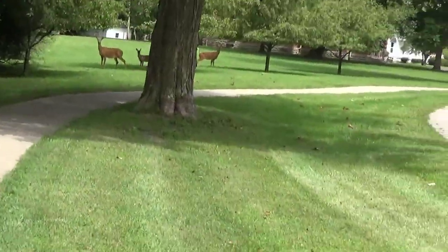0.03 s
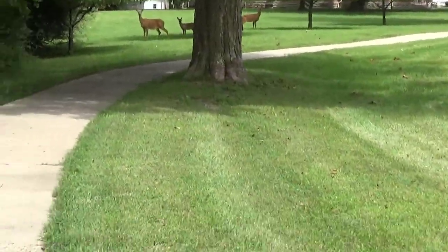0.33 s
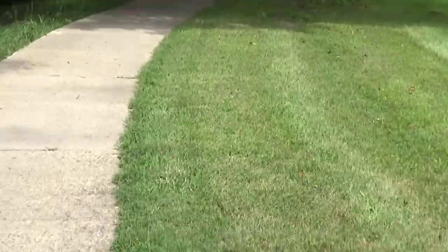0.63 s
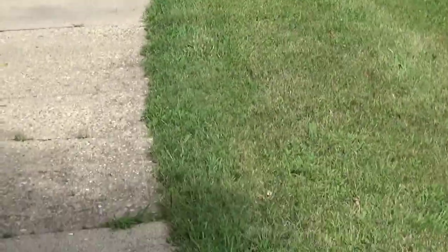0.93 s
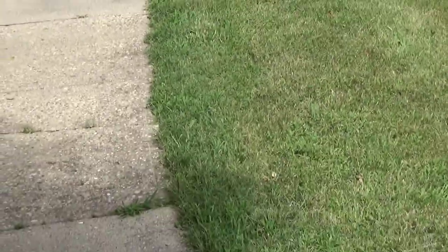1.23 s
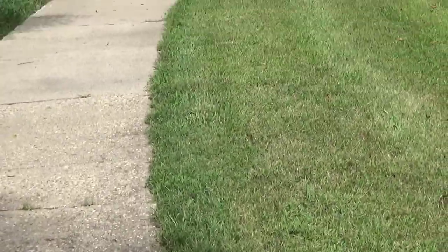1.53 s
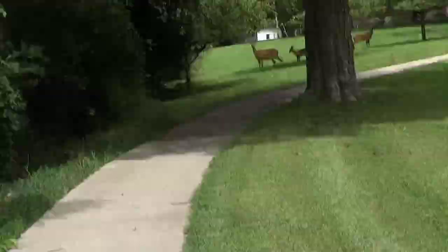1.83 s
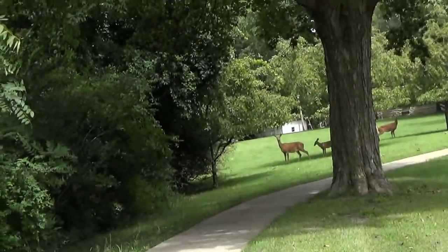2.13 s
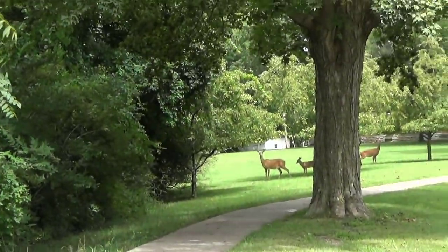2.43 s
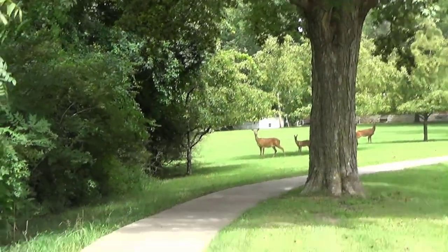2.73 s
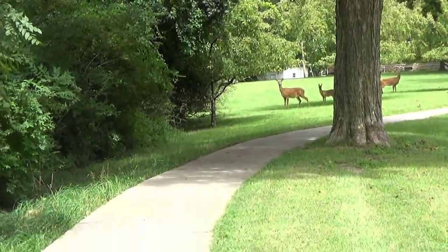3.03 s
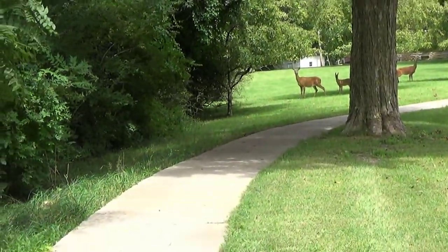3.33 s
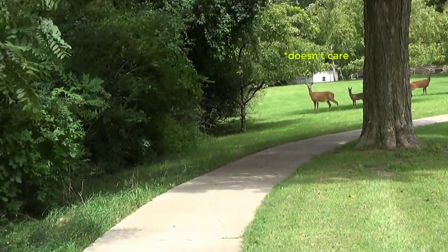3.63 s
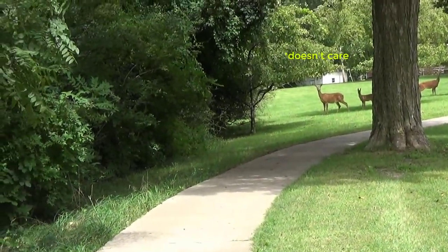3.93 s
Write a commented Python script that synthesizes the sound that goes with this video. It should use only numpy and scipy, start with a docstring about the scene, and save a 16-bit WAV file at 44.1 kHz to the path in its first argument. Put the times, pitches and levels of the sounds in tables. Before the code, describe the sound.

A bicycle bell rings close by outdoors. First the bike rolls with a low rushing noise, rattling at the start, ticking from 0.6 to 1.3 seconds, then clattering again. The bell comes in bright metallic flurries from about 1.6 to 2.2 seconds, 2.7 to 3, 3.1 to 3.5, and again near 3.9, ringing on between them. The rolling noise drops as the bell begins. Insects chirp faintly behind.

```python
"""Bicycle and thumb bell in a park

A bicycle rolls slowly: a ratchet ticks, loose parts rattle, insects chirp.
The bell is rung in four flurries; each clapper blow stops the dome and sets it ringing anew.
A limiter holds the bell down, so its low partials swell as the high ones die."""
import sys
import numpy as np
from scipy import signal
from scipy.fft import rfft, irfft
from scipy.io import wavfile
from scipy.ndimage import uniform_filter1d

SR = 44100
rng = np.random.default_rng(int(sys.argv[2]) if len(sys.argv) > 2 else 0)


def wav_out(sig):
    """Save sig, one row per channel (or a flat mono array), as 16-bit PCM at SR to the path in sys.argv[1]."""
    wavfile.write(sys.argv[1], SR, np.round(np.clip(np.atleast_2d(sig).T, -1, 1) * 32767).astype(np.int16))


N = 176400

# clapper blows: t/s, click/dB, partials 1-4/dB, twin 2/dB, twins 4 and 5/dB (twins re their partials)
BLOWS = [(1.568, -10, -24.5, -11, -8.5, -4, -17, -9.5), (1.646, -5, -24, -8.5, -16, -1, -7, -13),
         (1.679, -10, -43, -22.5, -18.5, -11, -25, -12), (1.709, -13, -36, -22, -15, -15, -7, -16),
         (1.73, -5.5, -22.5, -14, -7.5, -7.5, -17, -19), (1.885, -7.5, -27, -19, -15.5, -14, -22, -26),
         (1.934, -7, -23.5, -22.5, -22, 6.5, -3, -18), (1.974, -13, -38, -18, -10.5, -3, -16, -16),
         (2.013, -13, -29, -16.5, -12, 0, -20, -20), (2.047, -18, -27.5, -21.5, -7.5, -3, -17, -24),
         (2.064, -27, -28, -20.5, -15, -7.5, -22, -4.5), (2.113, -27, -30, -24, -26, -9, -21, -8),
         (2.191, -36, -32, -27, -31, -17.5, -30, -20), (2.667, -21, -39.5, -40.5, -28.5, -13, -18, -28),
         (2.722, -7, -25.5, -29, -10, 2, 8, -23), (2.754, -10.5, -24, -15.5, -5, 0.5, -21, -15),
         (2.807, -13, -29, -22.5, -15.5, -16, -19, -19), (2.838, -20, -37, -30, -13, -4.5, 2, -26),
         (2.908, -16, -42, -21, -17, -14.5, -5, -24), (2.943, -15, -33, -30.5, -13.5, -4.5, 8.5, -16),
         (2.975, -22.5, -46.5, -24, -15, -12, -19, -14), (3.009, -21, -27.5, -19.5, -5, -5.5, 6.5, -15),
         (3.022, -28, -33, -25, -11, -10.5, -10, 3.5), (3.129, -14, -31.5, -17, -11.5, -4, -11, -16),
         (3.208, -26, -40.5, -26.5, -16, -18, -5.5, -23), (3.259, -21, -38, -28.5, -33, -11.5, -7, -28),
         (3.275, -22, -49, -34, -21, -18, -4.5, -15), (3.341, -24, -51.5, -39.5, -40, -36, -21, -6),
         (3.408, -13.5, -30.5, -22, -12, -3, -8.5, -19), (3.452, -15, -27.5, -18.5, -14, -3.5, -21, -13),
         (3.88, -19, -34, -36.5, -18.5, -7.5, -14, -22), (3.907, -24, -29, -26.5, -21, -1, -17, -14),
         (3.927, -10, -27, -21.5, -16.5, -10, -6, -5), (3.945, -22, -28.5, -15.5, -5, -1, -12, -25),
         (3.968, -18, -24, -24, -7.5, 2.5, -15.5, -17)]
# dome partials 1-5: f/Hz
DOME_HZ = [1742.3, 4205.5, 7087.5, 10365.8, 14091]
# dome partials 1-5: T60/s
DOME_T60_S = [1.54, 1.45, 0.75, 0.34, 0.16]
# twins of partials 2-5: f/Hz
TWIN_HZ = [4162, 6985.5, 10187.5, 13819]
# lever hits its stop: t/s, level/dB
LEVER_STOPS = [(2.805, -10), (3.193, -8)]
# thumb drives the gears: start/s, end/s, level/dB
THUMB_STROKES = [(1.74, 1.935, -40.5), (3.153, 3.23, -37.5)]
# ratchet ticks: t/s, level/dB
RATCHET_TICKS = [(0.567, -26), (0.677, -24), (0.686, -24.5), (0.721, -23), (.750, -24), (0.856, -23.5),
                 (0.863, -31), (.876, -22), (.890, -26), (0.908, -21.5), (0.968, -20), (0.994, -20),
                 (1.007, -19), (1.021, -23), (1.030, -22), (1.039, -22.5), (1.048, -25), (1.059, -24),
                 (1.074, -20), (1.107, -19.5), (1.138, -18), (1.196, -19.5), (1.239, -20), (1.256, -17)]
# jolts of loose parts and bell lever: t/s, clatter/dB, knock/dB
RATTLES = [(0.0, -21.5, -45), (0.017, -16, -52), (.026, -16.5, -49), (0.09, -19.5, -45), (0.098, -38, -27),
           (0.103, -38, -20), (0.108, -19.5, -21.5), (0.117, -49, -18.5), (0.158, -25.5, -27),
           (1.216, -24, -27), (1.346, -18, -20.5), (1.375, -15, -16.5), (1.384, -23, -16), (1.4, -19, -24),
           (1.410, -18, -14), (1.433, -24, -30), (1.444, -9, -11.5), (1.525, -27.5, -27.5),
           (1.546, -28, -28.5), (1.607, -33, -18), (2.266, -39, -38), (2.299, -34, -46)]
# handlebar bumps: t/s, level/dB
BUMPS = [(0.103, -24.5), (1.828, -40), (1.901, -33.5), (2.264, -33)]
# loose bracket's modes: f/Hz
BRACKET_HZ = [630, 2802]
# resonances of frame and fittings: f/Hz, peak gain/dB
FRAME_MODES = [(2200, -6), (2835, -1), (3510, 6), (4380, 8), (5465, -0.5), (6720, 8), (8450, 2.5),
               (9020, -2), (9740, 1), (11100, 6.5)]
# chirp trains: start/s, end/s, f/Hz, chirp rate/Hz, level/dB
INSECTS = [(0, 1.7, 7360, 27.5, -38), (.2, 1.25, 4600, 10, -47), (2.2, 4, 8300, 21, -54)]
# rolling noise and open air: t/s, level/dB
AIR_LEVELS = [(0, -36), (.45, -37), (.9, -33), (1.62, -34.5), (1.69, -48), (2.3, -48.5), (4, -51)]
# noise spectra: f/Hz, relative density/dB
CLICK_SPECTRUM = [(500, -19), (1700, 0.5), (4000, -4.5), (8000, 8.5), (11000, 6), (15500, -14)]
STOP_SPECTRUM = [(300, -54), (750, -12), (1350, -6), (1880, 15), (2350, -19), (4500, -2), (9000, 1),
                 (15000, -26.5)]
TICK_SPECTRUM = [(1000, -8), (2600, -15), (3400, -2), (6500, -10.5), (8800, 4), (11200, 0.5), (12100, -14),
                 (15500, -11)]
CLATTER_SPECTRUM = [(1500, -30), (3800, -5.5), (7000, 1), (10000, 2), (11200, -8), (12500, -14),
                    (15500, -14)]
KNOCK_SPECTRUM = [(250, 7), (620, -0.5), (1200, -10.5), (1800, 4.5), (3400, 0), (8000, -24)]
BUMP_SPECTRUM = [(170, -11), (390, -2), (650, -3), (1000, -12.5), (8000, -18)]
AIR_SPECTRUM = [(25, -7), (70, -0.5), (200, -2.5), (750, -11), (2200, -18.5), (4000, -23), (6200, -23),
                (8500, -16), (12000, -28.5), (15500, -32)]

TIME_S = np.arange(N) / SR
FIFTH_RE_FOURTH_DB, THIRD_TWIN_DB = -12, -11.5
FIRM_CLICK_DB, GRIP_S, CONTACT_S, KICK_RAD_PER_KHZ = -22, 0.0019, 0.0014, 0.168
LIMIT_DB, LIMIT_SHARE, RELEASE_DB_PER_S = -18, 0.87, 412
SENSE_HZ, SENSE_S, CEILING, CUTOFF_HZ = 8040, 0.0051, 0.56, 15700


def bell():
    """Five dome partials; the upper four beat against their twins."""
    _, _, hum, second, third, fourth, low_twin, high_twin = np.transpose(BLOWS)
    fifth = fourth + FIFTH_RE_FOURTH_DB
    levels_db = [hum, second, third, fourth, fifth]
    twins_db = [second + low_twin, third + THIRD_TWIN_DB, fourth + high_twin, fifth + high_twin]
    modes = [*zip(DOME_HZ, DOME_T60_S, levels_db), *zip(TWIN_HZ, DOME_T60_S[1:], twins_db)]
    return sum(dome_mode(*mode) for mode in modes)


def dome_mode(hz, t60_s, levels_db):
    """Each blow resets the decaying mode's level; a firm one first chokes it and jolts its phase."""
    blow_s, click_db = np.transpose(BLOWS)[:2]
    firmness = np.minimum(from_db(click_db - FIRM_CLICK_DB), 1)
    last = np.maximum(np.searchsorted(blow_s, TIME_S) - 1, 0)
    coming = np.minimum(last + 1, len(blow_s) - 1)
    age_s = np.maximum(TIME_S - blow_s[last], 0)
    wait_s = blow_s[coming] - TIME_S
    choke = 1 - firmness[coming] * np.exp(-(wait_s / GRIP_S) ** 2) * (wait_s >= 0)
    kicks_rad = firmness * rng.normal(0, KICK_RAD_PER_KHZ * hz / 1000, len(blow_s))
    phase_rad = np.cumsum(kicks_rad) + 2 * np.pi * rng.random()
    decay = from_db(levels_db[last] - 60 * age_s / t60_s) * (TIME_S > blow_s[0])
    swing = choke * decay * np.exp(1j * phase_rad)[last]
    pole = np.exp(-2 / (CONTACT_S * SR))  # contact time rounds each step
    rounded = signal.lfilter([1 - pole], [1, -pole], swing)
    return np.real(rounded * np.exp(2j * np.pi * hz * TIME_S))


def bell_works():
    """The clapper clicks, the gears shudder after each blow, the lever hits its stop and rings."""
    blow_s, click_db, *partials_db, _, _ = np.transpose(BLOWS)
    stop_s, stop_db = np.transpose(LEVER_STOPS)
    clapper = bursts(blow_s, click_db - 4, CLICK_SPECTRUM, decay_s=0.00082)
    shudder = bursts(blow_s, np.max(partials_db, axis=0) - 29.5, CLICK_SPECTRUM, decay_s=0.021)
    stop = bursts(stop_s, stop_db, STOP_SPECTRUM, decay_s=0.0035)
    lever = ring(impulses(stop_s, stop_db - 9), hz=1818, t60_s=0.042)
    return clapper + shudder + stop + lever


def gears():
    """Teeth grind unevenly under the thumb."""
    gate = sum(from_db(db) * (TIME_S > start) * (TIME_S < end) for start, end, db in THUMB_STROKES)
    roughness = from_db(5.5 * drift(250))
    return frame(uniform_filter1d(gate, size=900) * roughness * noise(CLICK_SPECTRUM))


def ratchet():
    """Dry metallic ratchet ticks, ringing briefly."""
    tick_s, tick_db = np.transpose(RATCHET_TICKS)
    return frame(bursts(tick_s, tick_db + 2, TICK_SPECTRUM, decay_s=0.0048))


def rattles():
    """Loose parts clatter and knock on the frame; a bracket pings once; the handlebar bumps."""
    jolt_s, clatter_db, knock_db = np.transpose(RATTLES)
    clatter = bursts(jolt_s, clatter_db, CLATTER_SPECTRUM, decay_s=0.0081)
    knock = bursts(jolt_s, knock_db, KNOCK_SPECTRUM, decay_s=0.0052)
    bracket_hit = impulses(times_s=np.array([0.117]), db=-23)
    ping = sum(ring(bracket_hit, hz, t60_s=0.082) for hz in BRACKET_HZ)
    handlebar = bursts(*np.transpose(BUMPS), BUMP_SPECTRUM, decay_s=0.024)
    return frame(clatter + knock) + ping + handlebar


def frame(contacts):
    """Contacts sound directly and through the briefly ringing frame."""
    ringing = sum(from_db(db) * resonance(contacts, hz, width_hz=64) for hz, db in FRAME_MODES)
    return from_db(-1.5) * contacts + ringing


def whir():
    """Narrow-band rubbing noise, one swell as the bicycle rolls."""
    start_s, end_s = 0.49, 1.12
    swell = np.sin(np.interp(TIME_S, [start_s, end_s], [0, np.pi]))
    rubbing = rms_one(resonance(rng.standard_normal(N), hz=2090, width_hz=86))
    return from_db(-46.5) * swell * rubbing


def insects():
    """Trains of thin chirps, each arching in pitch."""
    out = np.zeros(N)
    for start_s, end_s, hz, rate_hz, db in INSECTS:
        arch = np.sin(2 * np.pi * rate_hz * TIME_S + drift(2) / 2)
        pitch_hz = hz * (1 + 0.009 * (arch - 1 + drift(300) / 2))
        gate = np.maximum(arch, 0) * (TIME_S > start_s) * (TIME_S < end_s)
        level = from_db(db + 2.5 * drift(5.03))
        out += level * gate * np.sin(2 * np.pi * np.cumsum(pitch_hz) / SR)
    return out


def air():
    """Low rolling noise and outdoor hiss, falling away as the bell starts."""
    level_db = np.interp(TIME_S, *np.transpose(AIR_LEVELS))
    flicker_db = 1.25 * drift(30.01)
    return from_db(level_db + flicker_db) * noise(AIR_SPECTRUM, side_db=-20)


def drone():
    """A low, wavering hum far away."""
    hz, level_db = 97.3, -57.5
    waver = 1 + drift(9) / 2
    return from_db(level_db) * rms_one(waver * np.sin(2 * np.pi * hz * TIME_S + drift(53)))


def from_db(db):
    """Decibels to gain."""
    return 10 ** (np.asarray(db) / 20)


def rms_one(x):
    """Scale to unit rms."""
    return x / np.sqrt(np.mean(x ** 2) + 1e-20)


def pan(x, left_re_right_db):
    """Stereo placement by level."""
    return x * from_db(np.array([[left_re_right_db], [-left_re_right_db]]) / 2)


def drift(rate_hz):
    """Random points joined by lines, unit rms."""
    return rms_one(np.interp(TIME_S * rate_hz, np.arange(1000), rng.standard_normal(1000)))


def noise(spectrum, side_db=-18):
    """Coloured stereo noise, unit rms."""
    hz, db = np.transpose(spectrum)
    bins_hz = np.maximum(np.fft.rfftfreq(N, 1 / SR), 1)
    gain = from_db(np.interp(np.log(bins_hz), np.log(hz), db)) * np.minimum(bins_hz / hz[0], 1)
    mid, side = irfft(rfft(rng.standard_normal((2, N))) * gain, N)
    return rms_one(mid + from_db(side_db) * side * np.array([[1], [-1]]))


def impulses(times_s, db):
    """One impulse per event."""
    out = np.full(N, 1e-18)
    out[np.clip((times_s * SR).astype(int), 0, N - 1)] = from_db(db)
    return out


def bursts(times_s, db, spectrum, decay_s):
    """Decaying noise per contact: a dense cluster of short-lived resonances."""
    envelope = signal.lfilter([1], [1, -np.exp(-1 / (decay_s * SR))], impulses(times_s, db))
    return envelope * noise(spectrum)


def ring(x, hz, t60_s):
    """A unit impulse starts a decaying sine of height 1."""
    r, w = from_db(-60 / (t60_s * SR)), 2 * np.pi * hz / SR
    return signal.lfilter([0, np.sin(w)], [1, -2 * r * np.cos(w), r * r], x)


def resonance(x, hz, width_hz):
    """Band-pass, unit peak gain."""
    r, w = np.exp(-np.pi * width_hz / SR), 2 * np.pi * hz / SR
    return signal.lfilter(np.array([1, 0, -1]) * (1 - r * r) / 2, [1, -2 * r * np.cos(w), r * r], x + 1e-18)


def scene():
    """Bell and bicycle close by, the park behind."""
    dome = pan(bell(), left_re_right_db=1.28)
    mechanics = pan(bell_works() + gears() + ratchet() + rattles(), left_re_right_db=0.2)
    return dome + mechanics + whir() + insects() + air() + drone()


def record(dry):
    """Fast limiter, less sensitive to top treble; then peak clipping and a steep low-pass."""
    sensed = signal.lfilter(*signal.butter(1, SENSE_HZ, fs=SR), dry.mean(axis=0))
    power = uniform_filter1d(sensed ** 2, int(SENSE_S * SR))
    over_db = np.maximum(10 * np.log10(np.maximum(power, 1e-12)) - LIMIT_DB, 0)
    release_db = RELEASE_DB_PER_S * TIME_S
    held_db = np.maximum.accumulate(over_db + release_db) - release_db
    limited = np.clip(dry * from_db(-LIMIT_SHARE * held_db), -CEILING, CEILING)
    return signal.sosfilt(signal.ellip(10, 0.2, 80, CUTOFF_HZ, fs=SR, output="sos"), limited)


dry = scene()
out = record(dry)
wav_out(out)
```